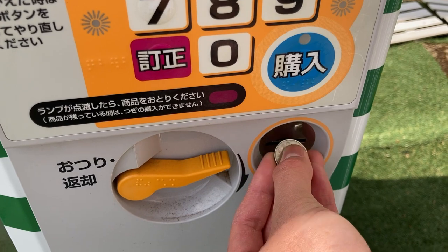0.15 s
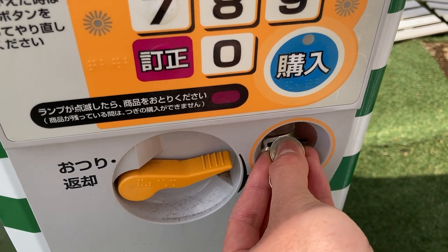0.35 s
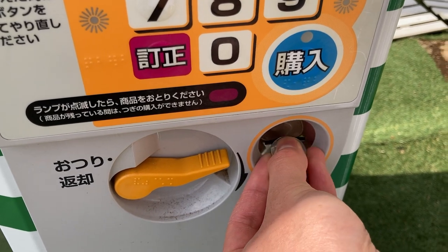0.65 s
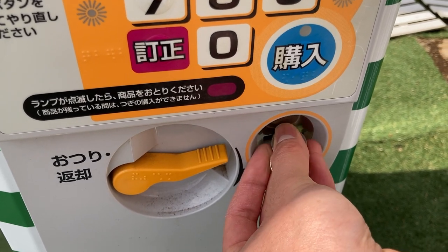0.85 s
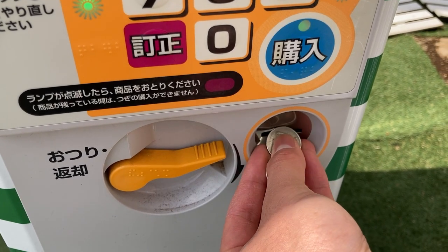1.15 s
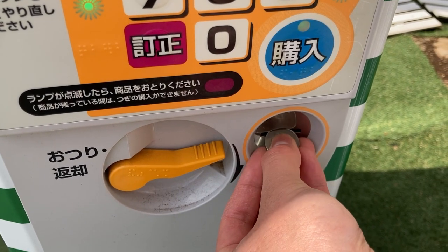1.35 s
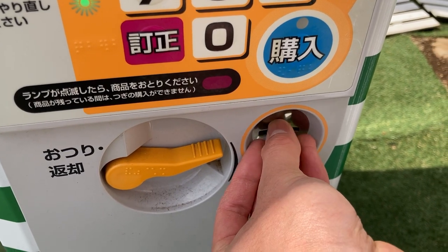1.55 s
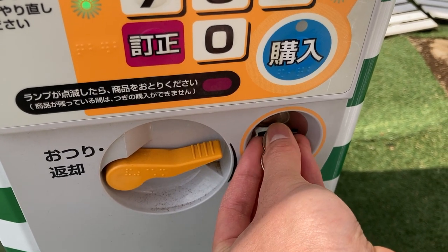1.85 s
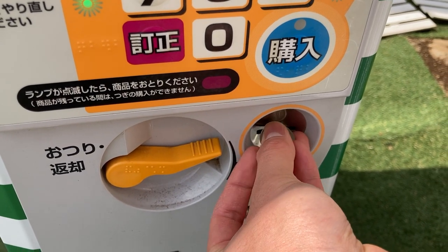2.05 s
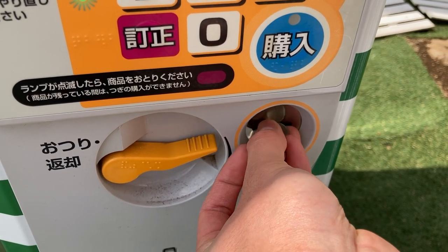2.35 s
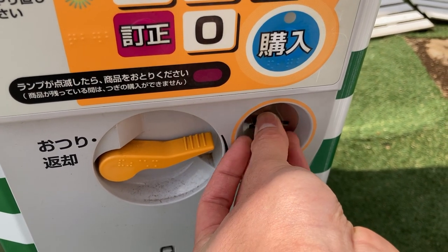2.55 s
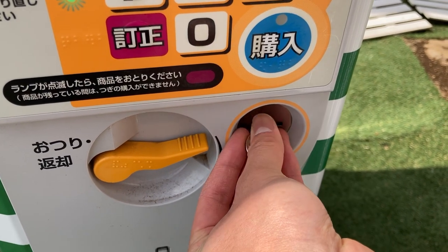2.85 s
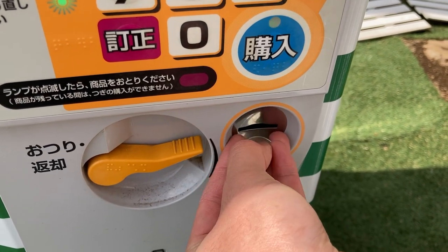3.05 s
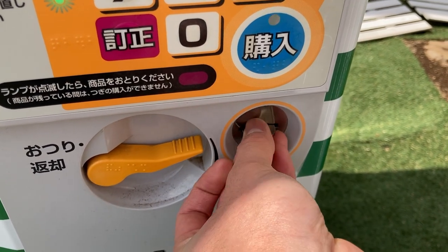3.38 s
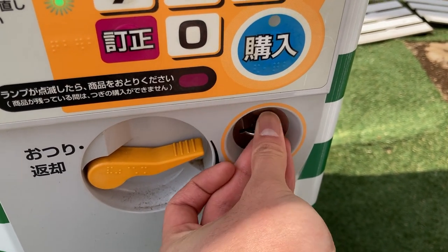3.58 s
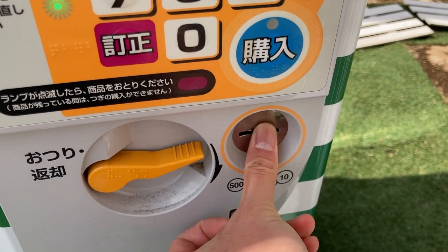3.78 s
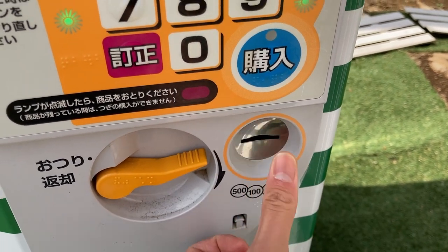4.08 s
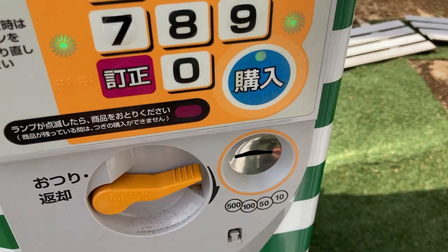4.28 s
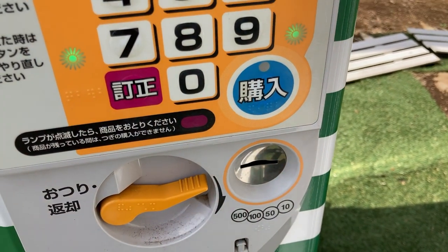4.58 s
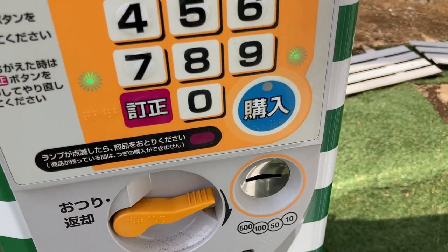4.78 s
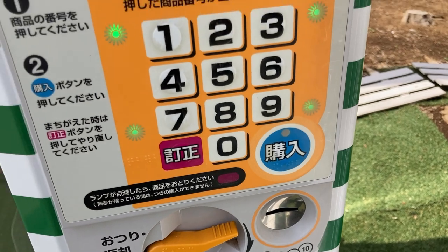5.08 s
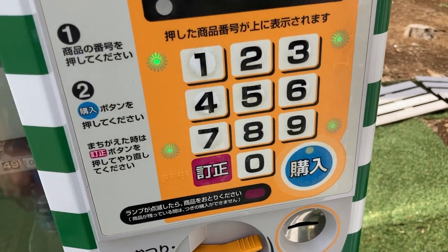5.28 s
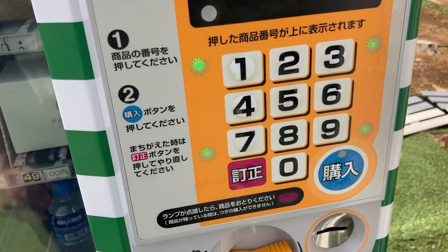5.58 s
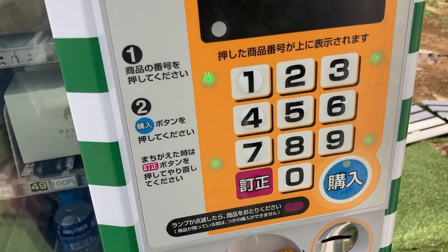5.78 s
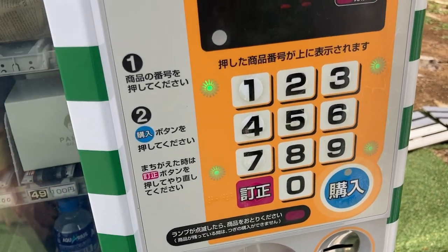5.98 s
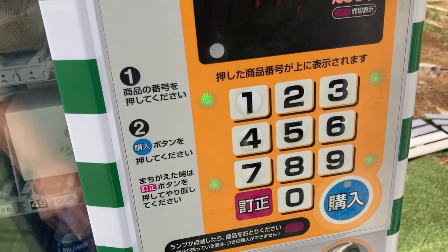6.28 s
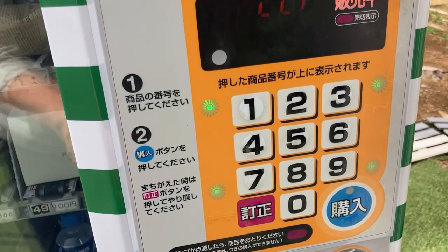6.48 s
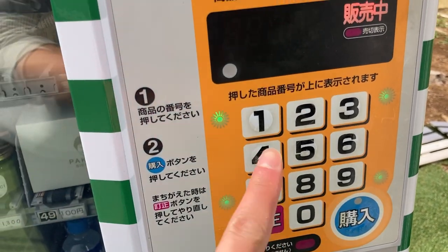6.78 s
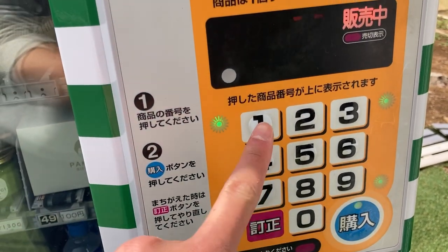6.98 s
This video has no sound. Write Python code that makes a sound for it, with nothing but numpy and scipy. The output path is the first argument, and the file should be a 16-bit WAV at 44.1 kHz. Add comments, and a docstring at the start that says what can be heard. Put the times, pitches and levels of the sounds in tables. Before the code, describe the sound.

Outdoors beside a road, coins are pushed one by one into a vending machine. Each clicks at the metal slot, scrapes, rings brightly and tumbles down the chute, with dull hollow thumps from the cabinet. A quick ridged ratchet sounds midway. The coin noises thin out after five seconds, then a vehicle rushes past, its engine note falling and tyres howling. The coins are close to a stereo handheld microphone.

```python
"""Road rumble lies under the whole scene: four flickering noise bands and a wavering engine note.
From the start, coins are pushed one by one into a vending machine outdoors: noise bursts and short notes knock,
rasping noise slides, swelling sines ring, and low sines boom from the cabinet as coins tumble down the chute.
At 3.3 s a milled edge ratchets over the slot lip as eight slowing snaps.
Near 6.2 s a vehicle drives past: its note drops by Doppler shift, with tyre howl and a brief gear whine."""
import sys
import numpy as np
from scipy import signal
from scipy.fft import rfft, irfft, next_fast_len
from scipy.io import wavfile
from scipy.ndimage import uniform_filter1d

SR = 44100
rng = np.random.default_rng(int(sys.argv[2]) if len(sys.argv) > 2 else 0)


def dump_mix(stems):
    """Bounce the given channels to the path in sys.argv[1] as a 16-bit WAV at rate SR."""
    frames = np.atleast_2d(stems).T  # one column per channel
    limited = np.clip(frames, -1, 1)  # hard clip at full scale
    pcm = np.round(limited * 32767).astype(np.int16)
    wavfile.write(sys.argv[1], SR, pcm)


N = 314858
SIZE = next_fast_len(N + SR // 4)
HZ = np.fft.rfftfreq(SIZE, 1 / SR) + 1  # offset keeps the logarithm finite
TIME = np.arange(N) / SR


def from_db(db):
    """Decibels to gain."""
    return 10 ** (np.asarray(db) / 20)


def rms_one(x):
    """Scale to rms 1."""
    return x / np.sqrt(np.mean(x ** 2) + 1e-20)


def at_hz(points):
    """Interpolate a spectrum table over log frequency."""
    hz, value = np.transpose(points)
    return np.interp(np.log(HZ), np.log(hz + 1), value)


def band(low_hz, high_hz):
    """Band gain with soft edges; neighbouring bands add up in power."""
    return 1 / np.sqrt((1 + (low_hz / HZ) ** 6) * (1 + (HZ / high_hz) ** 6))


def unit(gain):
    """Scale a filter so that white noise leaves it with rms 1."""
    return gain / np.sqrt(np.mean(gain ** 2))


def drift(rate_hz):
    """Slow random curve of rms 1: noise through two equal poles, computed every 40 samples."""
    pole = np.exp(-80 * np.pi * rate_hz / SR)
    noise = rng.standard_normal(N // 40 + 2002)
    slow = signal.lfilter([1], [1, -2 * pole, pole * pole], noise)[2000:]
    return np.interp(np.arange(N) / 40, np.arange(len(slow)), rms_one(slow))


def dying(clicks, t60_s):
    """Each click starts an exponential decay."""
    return signal.lfilter([1], [1, -from_db(-60 / (t60_s * SR))], clicks + 1e-18)


def ring(drive, hz, t60_s):
    """Two-pole resonator: a unit click starts a decaying sine of height 1."""
    pole = from_db(-60 / (t60_s * SR))
    step = 2 * np.pi * hz / SR
    return signal.lfilter([0, np.sin(step)], [1, -2 * pole * np.cos(step), pole * pole], drive + 1e-18)


def clicks_at(start_s, gain):
    """One-sample clicks at the given times."""
    out = np.zeros(N)
    out[np.round(np.asarray(start_s) * SR).astype(int)] = gain
    return out


def swelling(start_s, hz, level_db, swell_s, t60_s):
    """A sine that grows to its peak, then dies away exponentially."""
    out = np.zeros(N)
    part = slice(round(start_s * SR), round((start_s + .5) * SR))
    age = TIME[part] - start_s
    growth = np.clip(age / swell_s, 0, 1) ** 0.28
    decay = from_db(-60 * np.maximum(age - swell_s, 0) / t60_s)
    out[part] = from_db(level_db) * growth * decay * np.sin(2 * np.pi * hz * age)
    return out


def banded(envelopes, gains):
    """Three independent noises; each band follows its own envelope."""
    spectrum = 0
    for envelope, gain in zip(envelopes, gains):
        spectrum = spectrum + rfft(envelope * rng.standard_normal((3, N)), SIZE) * gain
    return irfft(spectrum, SIZE)[:, :N]


# Left minus right port: (frequency [Hz], level [dB])
PORT_BALANCE = [(180, -2), (550, 1.2), (1650, 7), (4970, 0.6), (15000, -0.5)]


def ports(sound, lead, alike):
    """Two microphone ports: row 0 reaches both with a phase lead, rows 1 and 2 are scattered sound at one port each."""
    side = np.array([[.5], [-.5]])
    share = np.clip(at_hz(alike), 0, 1)
    spectra = rfft(sound, SIZE)
    common = spectra[0] * np.sqrt(share) * np.exp(1j * side * at_hz(lead))
    scattered = spectra[1:] * np.sqrt(1 - share)
    return irfft((common + scattered) * from_db(side * at_hz(PORT_BALANCE)), SIZE)[:, :N]


PASS_S, PASS_M, PASS_M_PER_S = 6.182, 6.75, 13.5  # closest approach and speed
NOTE_HZ, SOUND_M_PER_S = 127.55, 343
# Engine note, rumble, drone, tyre roar, hiss: (far traffic [dB], vehicle alongside [dB],
# loss per doubling of distance [dB], gain from behind [dB])
ROAD_LAYERS = [(-56.5, -31, 5.5, 4.5), (-47, -33, 4.5, 1.5), (-52.5, -35, 15, 3), (-61, -37.5, 10.5, 3),
               (-69.5, -42.5, 11, 8.5)]


def passing():
    """Doppler-shifted note and layer gains along a straight drive-past; far traffic adds in power."""
    along = PASS_M_PER_S * (TIME - PASS_S)
    distance = np.hypot(along, PASS_M)
    leaving = along / distance
    gains = []
    for far_db, near_db, loss_db, rear_db in ROAD_LAYERS:
        vehicle_db = near_db - loss_db * np.log2(distance / PASS_M) + rear_db * leaving
        gains.append(np.hypot(from_db(far_db), from_db(vehicle_db)))
    return NOTE_HZ / (1 + leaving * PASS_M_PER_S / SOUND_M_PER_S), gains


# Relative noise spectrum: (frequency [Hz], level [dB per Hz])
TRAFFIC_SPECTRUM = [(25, -62.5), (49, -5.5), (180, -11), (400, -19), (750, -21), (1100, -16.5), (2500, -26),
                    (5500, -34.5), (9000, -44.5), (12000, -48), (16500, -77.5)]
# Edges of the four noise bands: (frequency [Hz])
ROAD_EDGES_HZ = (10, 250, 700, 1800, 20000)


def road_noise(levels):
    """Rumble, drone, tyre roar and hiss: four noise bands that flicker independently."""
    colour = from_db(at_hz(TRAFFIC_SPECTRUM))
    gains = [unit(colour * band(*edge)) for edge in zip(ROAD_EDGES_HZ, ROAD_EDGES_HZ[1:])]
    return banded([level * from_db(drift(6)) for level in levels], gains)


# (multiple of the note, level [dB])
ENGINE_ORDERS = [(.5, -7), (1, 0)]


def engine(note_hz, gain):
    """Sines at engine orders, wavering in pitch and level."""
    phase = 2 * np.pi * np.cumsum(note_hz * (1 + 0.01103 * drift(3.6))) / SR
    out = np.zeros(N)
    for multiple, level_db in ENGINE_ORDERS:
        out += np.sqrt(2) * gain * from_db(level_db + 2.5 * drift(3)) * np.sin(multiple * phase)
    return out


# (frequency [Hz], level [dB], t60 [s], on [s], full [s], gone [s])
HOWL = [(450, -42, .02, 5.72, 6.0, 6.2), (1300, -39, .007, 5.85, 6.05, 6.55),
        (980, -42, .06, 5.9, 6.6, 7.7), (1200, -45, .07, 6.6, 7.05, 7.5), (2300, -42, .005, 6.2, 6.95, 7.5)]


def tyre_howl():
    """Noise through resonators that swell and fade."""
    out = np.zeros(N)
    for hz, level_db, t60_s, *times_s in HOWL:
        swell = np.interp(TIME, times_s, [0, 1, 0])
        howl = rms_one(ring(rng.standard_normal(N), hz, t60_s))
        out += from_db(level_db + 2 * drift(18)) * swell * howl
    return out


WHINE_HZ, WHINE_DB = 405, -34
# (on [s], full [s], gone [s])
WHINE_TIMES = (6.22, 6.27, 6.75)


def gear_whine():
    """A brief steady-pitched sine of fluctuating level."""
    swell = np.interp(TIME, WHINE_TIMES, [0, 1, 0])
    return from_db(WHINE_DB + 2.7 * drift(6.5)) * swell * np.sin(2 * np.pi * WHINE_HZ * TIME)


def road():
    """Far traffic and the passing vehicle: scattered noise plus tones common to both ports."""
    note_hz, (note_gain, *noise_gains) = passing()
    out = road_noise(noise_gains)
    out[0] += engine(note_hz, note_gain) + tyre_howl() + gear_whine()
    return out


THUMP_T60_AT_140_HZ_S = 0.2
RATTLE_HZ, RATTLE_DB, RATTLE_T60_S = (156, 557), -9, 0.2
# Coin or flap on the cabinet: (time [s], level [dB], frequency [Hz])
THUMPS = [(0.234, -31, 410), (0.336, -29.5, 131), (0.702, -29, 138.6), (1.071, -28, 144.6),
          (1.18, -31.5, 164.4), (1.474, -29, 131.4), (2.145, -24.5, 141.4), (2.309, -35, 55.7),
          (2.823, -33, 449), (2.96, -31.5, 168), (3.403, -26.5, 128.3), (3.85, -26.5, 443),
          (4.327, -25.5, 140)]


def cabinet_thumps():
    """Decaying panel sines, quicker when higher; each shakes a dull noise rattle from the panel."""
    start_s, level_db, _ = np.transpose(THUMPS)
    clicks = clicks_at(start_s, from_db(level_db + RATTLE_DB))
    shaken = uniform_filter1d(dying(clicks, RATTLE_T60_S), size=400)
    out = banded([shaken], [unit(band(*RATTLE_HZ))])
    for s, db, hz in THUMPS:
        out[0] += swelling(s, hz, db, 1.0 / hz, THUMP_T60_AT_140_HZ_S * 140 / hz)
    return out


# (time [s], frequency [Hz], level [dB], swell [s], t60 [s])
RINGS = [(0.105, 11500, -27, 0.0011, 0.12), (0.146, 11300, -34, 0.01, 0.099),
         (0.836, 10810, -18, 0.011, 0.059), (1.546, 11030, -24.5, .003, 0.073),
         (1.586, 10800, -21.5, 0.0031, 0.051), (2.737, 10710, -23.5, 0.008, 0.058)]


def coin_rings():
    """A free coin sings as a high sine, swelling as it turns its face."""
    return sum(swelling(*row) for row in RINGS)


SLIDE_FADE_DB_PER_S, SLIDE_TAIL_DB, SLIDE_TAIL_T60_S = 24, -16.5, 1
# Coin rubbing the slot or rolling down the chute: (time [s], length [s], starting level [dB])
SLIDES = [(0.209, 0.28, -52.5), (0.673, 0.067, -40), (0.751, 0.61, -46), (1.436, 0.12, -44.5),
          (1.654, 0.31, -50.5), (2.11, 0.22, -53.5), (2.426, 0.19, -49.5), (2.703, 0.077, -50),
          (2.812, 0.2, -49), (3.354, 0.325, -53), (3.762, 0.33, -48.5), (4.278, 0.16, -55),
          (4.468, 0.044, -55.5), (4.733, 0.1, -56.5), (4.885, 0.064, -56)]


def pressure():
    """How hard a coin rubs: a quick onset, a fade, then a drop to a faint decaying tail."""
    out = np.zeros(N)
    for start_s, length_s, level_db in SLIDES:
        age = TIME - start_s
        fade_db = -SLIDE_FADE_DB_PER_S * np.abs(age)
        tail_db = SLIDE_TAIL_DB - SLIDE_FADE_DB_PER_S * length_s - 60 * (age - length_s) / SLIDE_TAIL_T60_S
        out += (age > 0) * from_db(level_db + np.where(age < length_s, fade_db, tail_db))
    return uniform_filter1d(out, size=500)


# Metal contact spectrum, shared by slides and knocks: (frequency [Hz], level [dB per Hz])
CONTACT_SPECTRUM = [(250, 1.5), (700, -3.5), (1150, -0.5), (1700, -3.5), (3900, -3), (5400, -6),
                    (7000, -11), (9200, -10), (11000, -11), (15500, -16)]
# Edges of the contact noise bands: (frequency [Hz])
CONTACT_EDGES_HZ = (200, 800, 1600, 3200, 5500, 8500, 20000)


def rasp_noise(rasp):
    """Rubbing noise in three bands whose levels drift apart, shifting its colour."""
    colour = unit(from_db(at_hz(CONTACT_SPECTRUM)) * band(820, 20000))
    edges = list(zip(CONTACT_EDGES_HZ[1::2], CONTACT_EDGES_HZ[3::2] + CONTACT_EDGES_HZ[-1:]))
    return banded([rasp * from_db(4.5 * drift(26)) for _ in edges], [colour * band(*edge) for edge in edges])


RASP_T60_S, RASP_RING_DB = 0.012, -16.5
RASP_SHIFT = 0.063  # each slot note also sounds this share lower and higher
# Slot resonances: (frequency [Hz])
SLOT_HZ = (1120, 2410, 2990, 4500, 6900)


def slot_ringing(rasp):
    """Rubbing noise drives short slot resonances in randomly varying proportions."""
    out = np.zeros(N)
    for hz in np.outer(SLOT_HZ, (1 - RASP_SHIFT, 1, 1 + RASP_SHIFT)).ravel():
        drive = rasp * from_db(7 * np.tanh(drift(12))) * rng.standard_normal(N)
        level_db = RASP_RING_DB + np.interp(hz, *np.transpose(CONTACT_SPECTRUM))
        out += from_db(level_db) * ring(drive, hz, RASP_T60_S)
    return out


ROLLING_DB, COIN_ROLLING_REL_DB, COIN_T60_S = -22, -18, .12
# Chute modes, shared by rolling and knocks: (frequency [Hz], relative level [dB], t60 [s])
CHUTE = [(1110, -14, .045), (2835, -11, .06), (3745, -8.5, .06), (4060, -10, .05), (6850, -10, .028)]
# Coins loose in the chute, shared by rolling and knocks: (free [s], landed [s], own note [Hz])
COINS = [(.1, .52, 11420), (.8, 1.25, 10520), (1.5, 1.96, 10620), (2.7, 3.12, 10720), (3.78, 4.1, 10970)]


def rolling_hum(rasp):
    """A rolling coin drives the chute's modes and its own note with fluctuating noise."""
    out = np.zeros(N)
    drives = [rasp * from_db(6 * np.tanh(drift(14))) * rng.standard_normal(N) for _ in range(len(CHUTE) + 1)]
    for free_s, landed_s, note_hz in COINS:
        part = slice(round(free_s * SR), round((landed_s + .1) * SR))
        rolling = TIME[part] < landed_s
        modes = list(CHUTE) + [(note_hz, COIN_ROLLING_REL_DB, COIN_T60_S)]
        for drive, (hz, level_db, t60_s) in zip(drives, modes):
            out[part] += from_db(level_db + ROLLING_DB) * ring(drive[part] * rolling, hz, t60_s)
    return out


def slides():
    """Lumpy friction: one pressure curve drives the rasp, the slot and the rolling hum."""
    rasp = pressure() * from_db(2.2 * drift(34) + 3 * drift(200))
    out = rasp_noise(rasp)
    out[0] += slot_ringing(rasp) + rolling_hum(rasp)
    return out


RATCHET_S, FIRST_GAP_S, GAP_GROWTH, TEETH = 3.265, .0088, 1.062, 8
TOOTH_DB, TOOTH_FADE_DB = -16, 1.4  # third tooth; loss per step away from it
NEUTRAL_HZ, BRIGHT_DB = 3400, 2  # tilt [dB per octave] gained per octave of note above neutral
# Coin on slot or chute: (time [s], level [dB], strongest note [Hz])
KNOCKS = [(0.058, -37, 12300), (0.1058, -20.5, 11300), (0.1387, -24.0, 11800), (0.1666, -25.5, 3800),
          (0.218, -27, 3980), (0.2345, -22.5, 3500), (0.2439, -24.5, 3940), (0.2814, -19.0, 3960),
          (0.3068, -21, 12800), (0.3223, -21, 6700), (0.3417, -27, 6760), (0.3826, -30.5, 2780),
          (0.4235, -34.5, 1010), (0.4535, -30.5, 6900), (0.4864, -35, 7950), (0.6221, -41.0, 1050),
          (0.679, -26.5, 10090), (0.6935, -26.5, 2950), (0.7877, -21.5, 11300), (0.813, -49, 4500),
          (0.834, -23.5, 10730), (0.9029, -22, 4100), (0.9823, -20.5, 3960), (1.0137, -22.5, 13000),
          (1.0197, -22.5, 6900), (1.034, -23, 1270), (1.0516, -29.5, 6870), (1.0845, -26.5, 1320),
          (1.134, -41, 3670), (1.1529, -24, 6650), (1.187, -44, 3760), (1.2167, -27, 11740),
          (1.2561, -30, 2810), (1.306, -50, 1270), (1.4717, -26, 2410), (1.5455, -19.5, 10650),
          (1.5694, -30, 1110), (1.5859, -23.5, 10900), (1.605, -33, 10750), (1.623, -37, 10600),
          (1.6483, -20.5, 3370), (1.66, -34, 4030), (1.7281, -22, 12730), (1.745, -20.5, 3640),
          (1.7505, -26, 2940), (1.779, -28.0, 6900), (1.8224, -27, 1200), (1.845, -31, 4000),
          (1.872, -31.5, 2800), (1.8872, -24, 6690), (1.9376, -30, 12470), (2.13, -35.5, 1086),
          (2.149, -32, 8130), (2.1726, -31.5, 3960), (2.2379, -32, 1174), (2.355, -23.5, 11020),
          (2.3591, -19.5, 11160), (2.4534, -26.5, 1204), (2.4839, -28, 11340), (2.5228, -31.5, 1140),
          (2.6061, -20.5, 10800), (2.6141, -23, 10800), (2.7243, -29, 10810), (2.7517, -25, 10690),
          (2.8221, -21.5, 4070), (2.879, -22, 6900), (2.9104, -16.0, 7360), (2.9528, -24.5, 6860),
          (3.0605, -26.5, 3780), (3.2052, -23.5, 3050), (3.2426, -19.0, 2800), (3.2516, -27.5, 1120),
          (3.369, -36, 990), (3.3918, -28, 4100), (3.416, -33, 4000), (3.4382, -27, 11100),
          (3.4841, -33.5, 1100), (3.5878, -22, 11270), (3.6402, -34, 1140), (3.6946, -34, 3680),
          (3.7709, -31.5, 1120), (3.7874, -27.0, 4800), (3.8103, -24, 3390), (3.8183, -25.0, 6900),
          (3.8507, -27, 1030), (3.8742, -25.5, 7150), (3.8817, -21, 10400), (3.9066, -19.5, 1235),
          (3.9206, -22.5, 6700), (3.953, -29.5, 6800), (4.0568, -28, 6870), (4.299, -35, 1010),
          (4.3202, -29, 6800), (4.3421, -32.5, 3930), (4.4035, -29.5, 1100), (4.492, -35.5, 1184),
          (4.5841, -34, 4340), (4.6694, -28, 4960), (4.755, -33.5, 1190), (4.7737, -30, 2600),
          (4.825, -35, 2380), (4.9782, -25.5, 4300), (5.0625, -26.5, 1220), (5.295, -59, 840)]


def contacts():
    """All contact times, levels and notes: the knocks, then a milled edge ratcheting over the slot lip, slowing."""
    gaps_s = FIRST_GAP_S * GAP_GROWTH ** np.arange(TEETH - 1)
    teeth_s = RATCHET_S + np.cumsum(np.r_[0, gaps_s])
    teeth = [(s, TOOTH_DB - TOOTH_FADE_DB * abs(k - 2), NEUTRAL_HZ) for k, s in enumerate(teeth_s)]
    return np.transpose(list(KNOCKS) + teeth)


KNOCK_RISE_S = 0.001028
BURST_DB, BURST_LUCK_DB = 3, 2.5  # burst over contact level; random spread per band
BURST_T60_S, ECHO_T60_S = 0.019, 0.077  # for a band starting at 2.5 kHz
ECHO_DB, TOOTH_ECHO = -7.5, .25  # TOOTH_ECHO: share of echo left while the coin is held
BODY_SHARE, BODY_FROM_DB = 0.34, -26.5  # harder knocks shake the panel: dB of lows gained per dB
SCUFF_T60_S = .035
SCUFF_DB, SCUFF_SOFT = -7, 0.92  # at -44.5 dB; dB lost per dB above


def contact_bursts(start_s, level_db, tilt_db):
    """Noise bursts for tiny contacts: a scuff leads in, a cabinet echo follows; lows last longer."""
    teeth_s = start_s[-TEETH:]
    held = (TIME >= teeth_s[0]) & (TIME < teeth_s[-1] + FIRST_GAP_S)
    scuff = clicks_at(start_s, from_db(np.minimum(SCUFF_DB - SCUFF_SOFT * (level_db + 44.5), -1)))
    smooth = np.exp(-1 / (KNOCK_RISE_S * SR))
    colour = from_db(at_hz(CONTACT_SPECTRUM))
    envelopes, gains = [], []
    for k, (low_hz, high_hz) in enumerate(zip(CONTACT_EDGES_HZ, CONTACT_EDGES_HZ[1:])):
        octaves = max(np.log2(low_hz / 2500), -2)
        body_db = (k == 0) * BODY_SHARE * np.maximum(level_db - BODY_FROM_DB, 0)
        luck_db = BURST_LUCK_DB * rng.standard_normal(len(start_s))
        hits = clicks_at(start_s, from_db(level_db + body_db + BURST_DB + octaves * tilt_db + luck_db))
        longer = 2 ** (-.125 * octaves)
        lead_in = dying((hits * scuff)[::-1], SCUFF_T60_S)[::-1]  # grows towards the contact
        direct = dying(hits, longer * BURST_T60_S) + lead_in
        echo = from_db(ECHO_DB) * dying(hits, longer * ECHO_T60_S)
        shape = np.where(held, 0, direct) + np.where(held, TOOTH_ECHO, 1) * echo
        envelopes.append(signal.lfilter([1 - smooth], [1, -smooth], shape))
        gains.append(colour * band(low_hz, high_hz))
    return banded(envelopes, gains)


SNAP_DB, TOOTH_T60_S = 12.5, .012  # snap level over that of its tooth


def tooth_snaps(teeth_s, level_db):
    """One short noise snap, repeated identically at every tooth."""
    age = TIME[:SR // 20] / TOOTH_T60_S
    snap = rng.standard_normal(len(age)) * from_db(-60 * age) * (1 - np.exp(-10 * age))
    colour = from_db(at_hz(CONTACT_SPECTRUM)) * band(SLOT_HZ[0] / 2, SR)
    spectrum = rfft(clicks_at(teeth_s, from_db(level_db)), SIZE) * rfft(snap, SIZE) * colour
    return irfft(spectrum, SIZE)[:N] * from_db(SNAP_DB)


CLANK_LOW_HZ, CLANK_HIGH_HZ, CLANK_T60_S, CLANK_DB = 900, 13000, .045, -12
NOTE_DB = 9  # a knock's own note over its chance ones; half for a tooth
# Notes of every tooth: (frequency [Hz])
TOOTH_HZ = (1120, 2410, 5150, 7630)


def clanks(start_s, level_db, note_hz, tilt_db):
    """Each contact finds a bit of metal: four short sines, its own note favoured, coloured like the knock."""
    pitch = CLANK_LOW_HZ * (CLANK_HIGH_HZ / CLANK_LOW_HZ) ** rng.random((len(start_s), 4))
    pitch[:, 0] = note_hz
    pitch[-TEETH:] = TOOTH_HZ
    t60_s = np.r_[np.full(len(KNOCKS), CLANK_T60_S), np.full(TEETH, TOOTH_T60_S)]
    colour_hz, spectrum_db = np.transpose(CONTACT_SPECTRUM)
    tone_db = np.interp(np.log(pitch), np.log(colour_hz), spectrum_db) / 2
    tone_db += tilt_db[:, None] * np.log2(pitch / 2500) / 2
    softness_db = np.maximum(BODY_FROM_DB - level_db[:-TEETH], 0)
    tone_db[:-TEETH, 0] += NOTE_DB + softness_db / 2  # soft knocks are purer
    tone_db[-TEETH:] += NOTE_DB / 2
    age = np.arange(4096) / SR
    rise = 1 - np.exp(-age / KNOCK_RISE_S)
    out = np.zeros(N + 4096)
    for s, db, hz, notes_db, lasts_s in zip(start_s, level_db, pitch[..., None], tone_db[..., None], t60_s):
        notes = from_db(notes_db - 60 * age / lasts_s) * np.sin(2 * np.pi * hz * age)
        out[round(s * SR):][:len(age)] += from_db(db + CLANK_DB) * notes.sum(axis=0) * rise
    return out[:N]


CHUTE_INSIDE_DB, CHUTE_OUTSIDE_DB, CHUTE_LUCK_DB = 2, -10.5, 3.5
NEAR_DB = 6  # mode loss per octave from the knock's note


def chute_ringing(start_s, level_db, note_hz):
    """Contacts strike the chute's modes; those at the slot barely reach it, a held coin even less."""
    inside = np.any([(start_s > free_s) & (start_s < landed_s) for free_s, landed_s, _ in COINS], axis=0)
    reach_db = np.where(inside, CHUTE_INSIDE_DB, CHUTE_OUTSIDE_DB)
    reach_db[-TEETH:] = 2 * CHUTE_OUTSIDE_DB
    out = np.zeros(N)
    for hz, mode_db, t60_s in CHUTE:
        away_db = NEAR_DB * np.abs(np.log2(note_hz / hz))
        luck_db = CHUTE_LUCK_DB * rng.standard_normal(len(start_s))
        gain = from_db(level_db + mode_db + reach_db - away_db + luck_db)
        out += ring(clicks_at(start_s + KNOCK_RISE_S, gain), hz, t60_s)
    return out


COIN_STRUCK_DB, COIN_LUCK_DB = -24, 2


def loose_coins(start_s, level_db):
    """Knocks set each coin loose in the chute ringing at its own note."""
    gain = from_db(level_db + COIN_LUCK_DB * rng.standard_normal(len(start_s)) + COIN_STRUCK_DB)
    out = np.zeros(N)
    for free_s, landed_s, hz in COINS:
        loose = (start_s > free_s) & (start_s < landed_s)
        out += ring(clicks_at(start_s, loose * gain), hz, COIN_T60_S)
    return out


def knocks():
    """Each contact is a noise burst that also excites nearby metal, the chute and any loose coin."""
    start_s, level_db, note_hz = contacts()
    tilt_db = BRIGHT_DB * np.log2(note_hz / NEUTRAL_HZ)
    out = contact_bursts(start_s, level_db, tilt_db)
    out[0] += tooth_snaps(start_s[-TEETH:], level_db[-TEETH:])
    out[0] += clanks(start_s, level_db, note_hz, tilt_db)
    out[0] += chute_ringing(start_s, level_db, note_hz)
    out[0] += loose_coins(start_s, level_db)
    return out


# Left port's phase lead: (frequency [Hz], phase [rad])
ROAD_LEAD = [(200, .3), (750, -2.6), (1700, -2.6), (5500, 2.8), (6700, 6.3), (11500, 0), (15500, -6.3)]
COIN_LEAD = [(200, .2), (780, 2.3), (1290, .2), (2330, 1.6), (4130, .6), (5510, 2.8), (9200, -3.1),
             (16400, -12.5)]
# Share of sound common to both ports: (frequency [Hz], share [0-1])
ROAD_ALIKE = [(150, 0.98), (400, 0.74), (750, 0.5), (3500, 0.37), (9000, 1)]
COIN_ALIKE = [(150, 1), (700, 0.93), (2000, 0.029), (9000, 0.98)]


def scene():
    """Road and coins, each with its own phase lead and scatter at the ports."""
    coins = cabinet_thumps() + slides() + knocks()
    coins[0] += coin_rings()
    return ports(road(), ROAD_LEAD, ROAD_ALIKE) + ports(coins, COIN_LEAD, COIN_ALIKE)


CUTOFF_HZ = 17000


def record(dry):
    """A steep low-pass removes the top, 70 dB down from the cutoff."""
    return signal.sosfilt(signal.cheby2(12, 70, CUTOFF_HZ, fs=SR, output="sos"), dry)


dry = scene()
out = record(dry)
dump_mix(out)
```